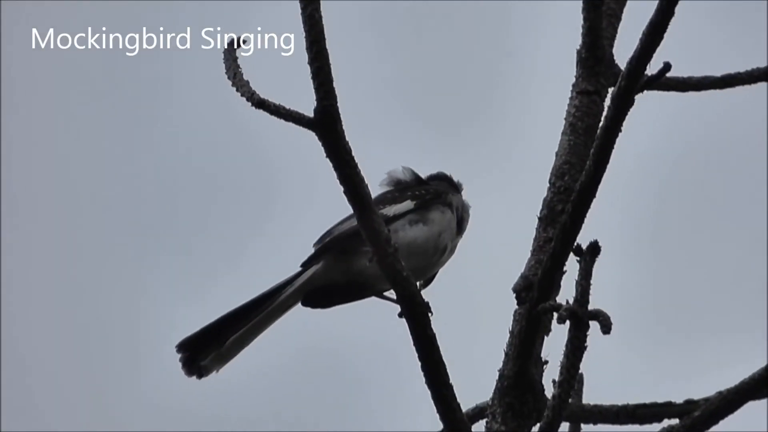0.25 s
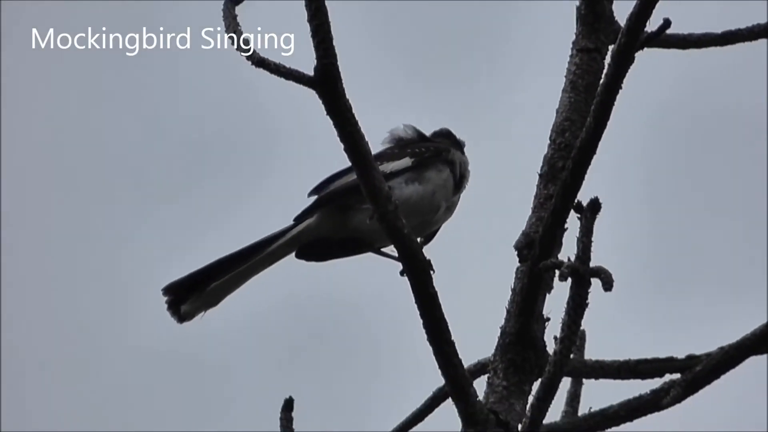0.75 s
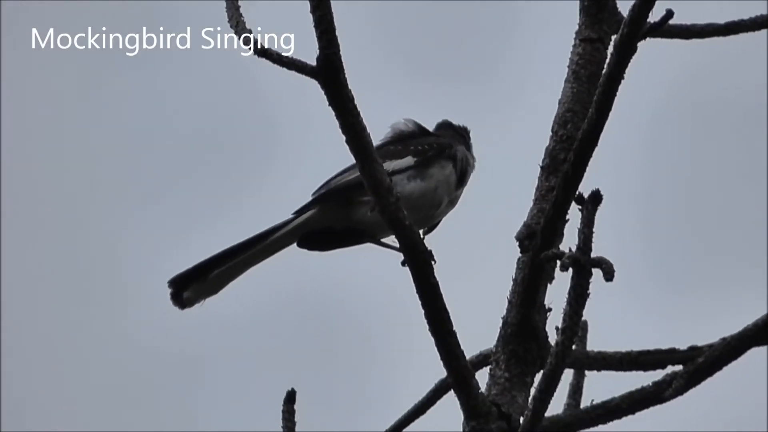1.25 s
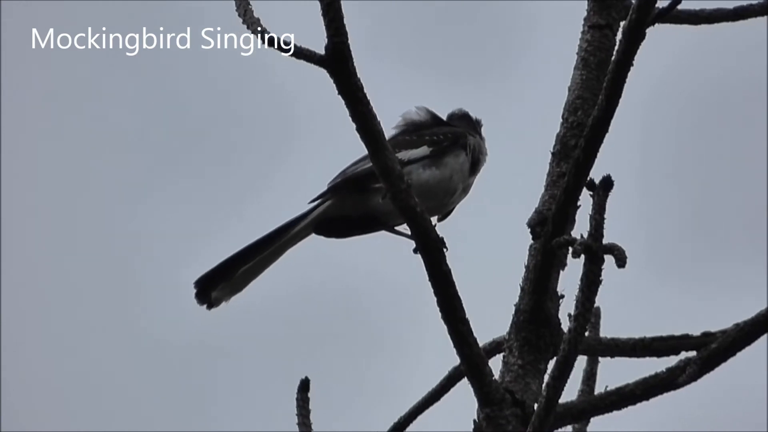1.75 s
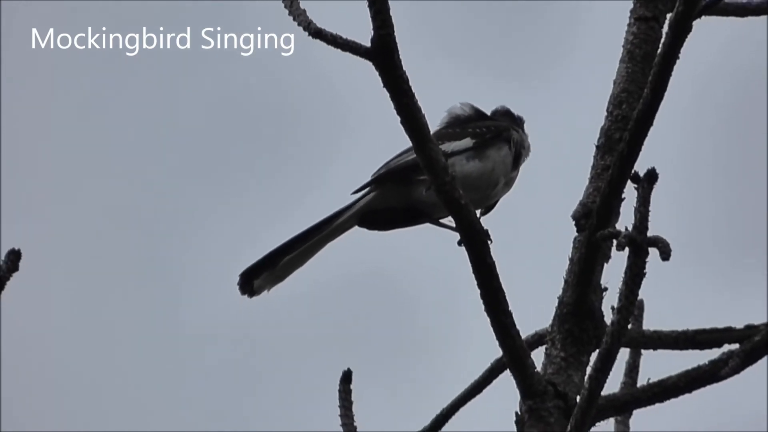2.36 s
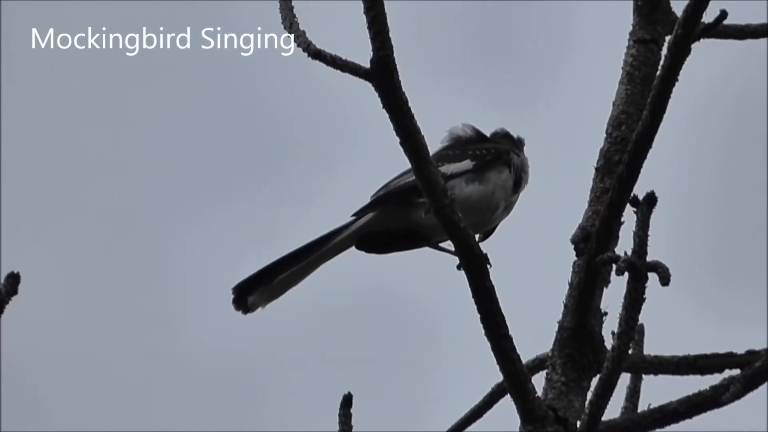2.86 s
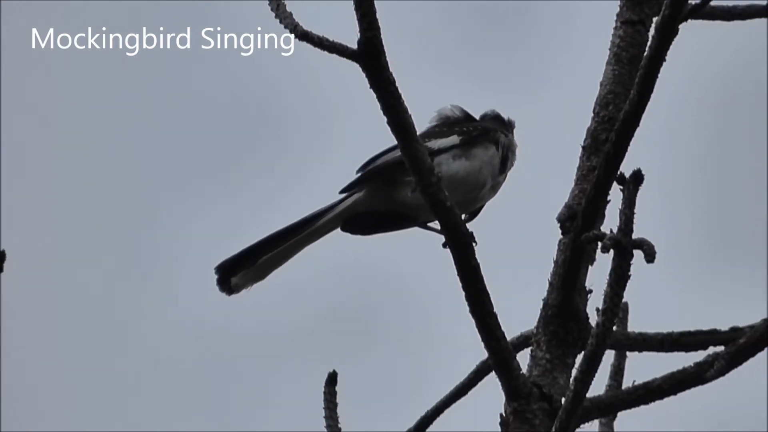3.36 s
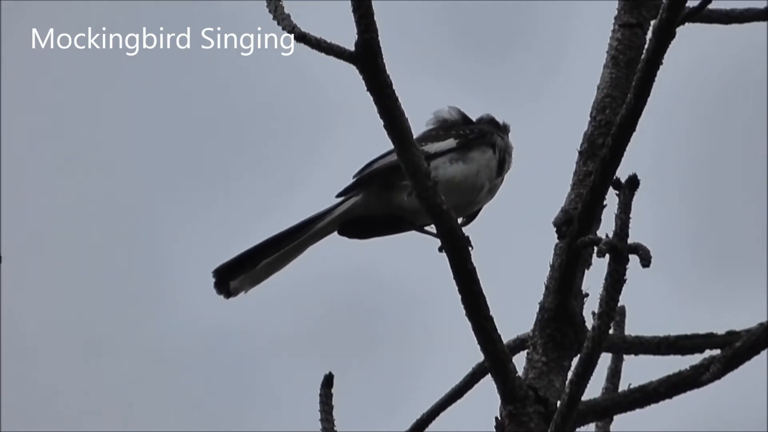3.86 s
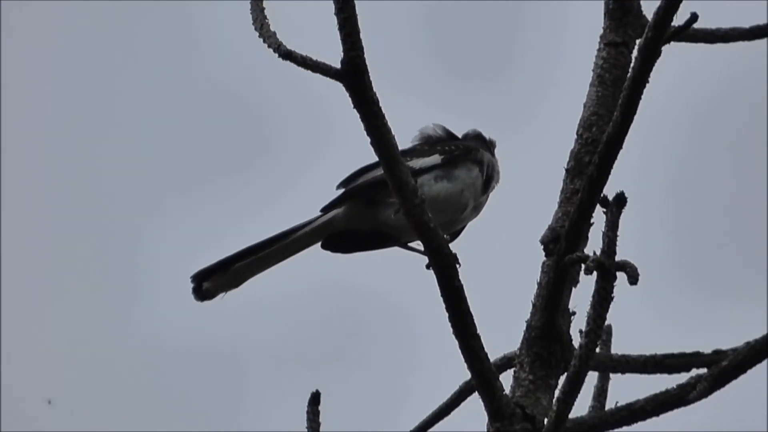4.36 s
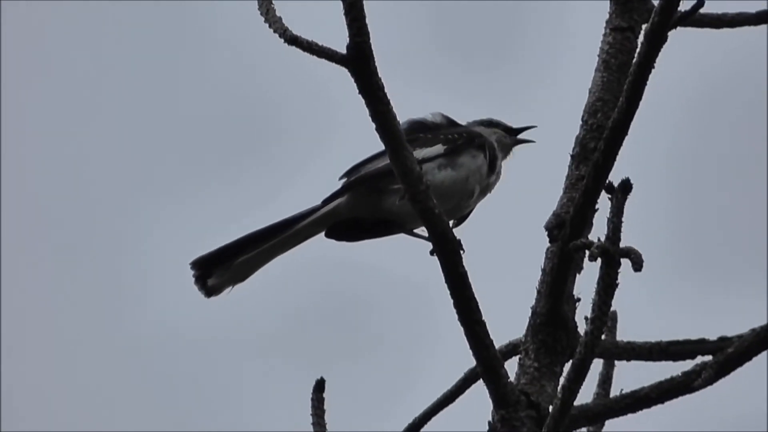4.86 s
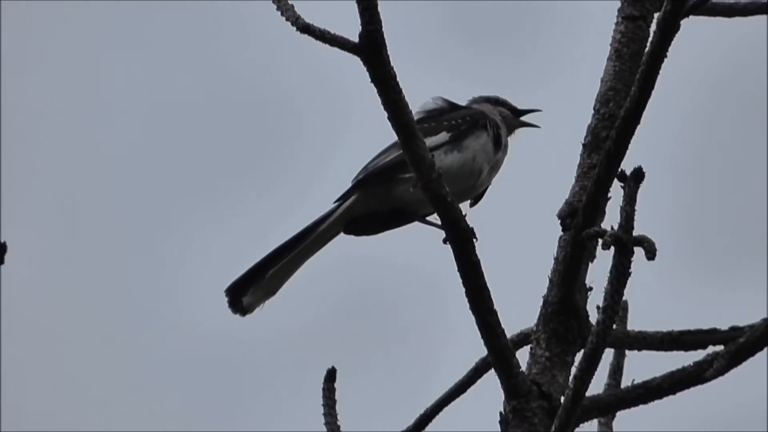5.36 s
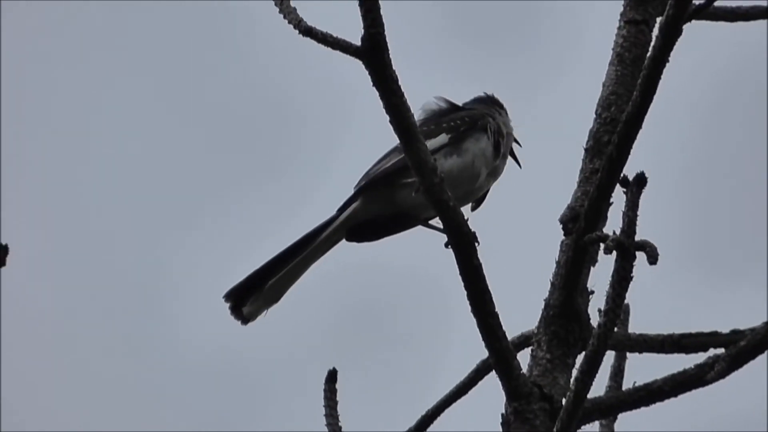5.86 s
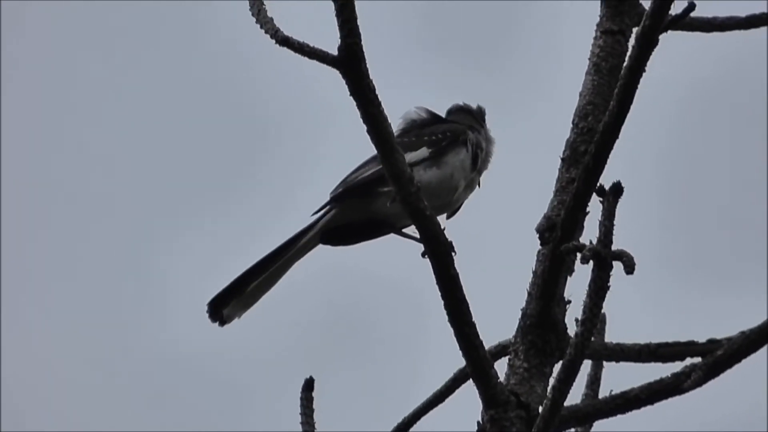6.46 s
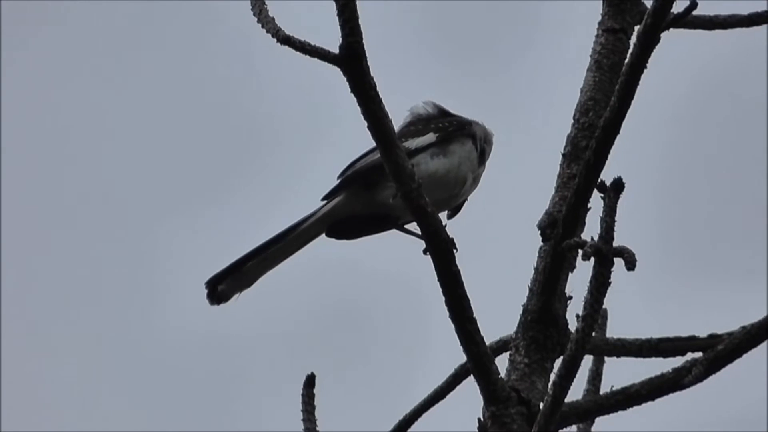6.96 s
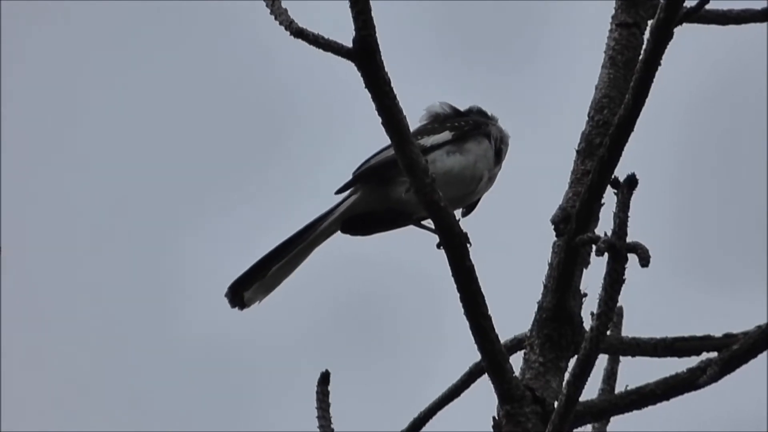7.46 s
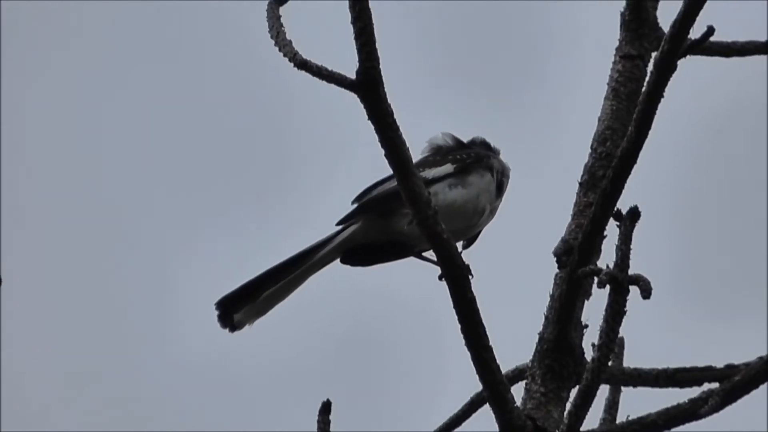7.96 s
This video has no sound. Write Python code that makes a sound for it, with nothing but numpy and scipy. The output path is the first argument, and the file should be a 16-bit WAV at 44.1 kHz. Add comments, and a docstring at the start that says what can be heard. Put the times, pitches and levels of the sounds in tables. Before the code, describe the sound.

A songbird sings outdoors, clear and up front, with a short, light echo from its surroundings. Two quick high chirps sound at the very start, then six more in a fast run from about 0.7 to 1.3 seconds. These lead straight into a string of higher, buzzy warbles, about eight a second, until 3.1 seconds. The bird pauses, leaving very faint slides and a rasp from distant birds. From 4.4 to 5 seconds it gives four quick rising whistles, followed by one arched whistle. Three longer falling whistles run from 5.5 to 6.7 seconds. Three short, sharp upward whips close the song at about 6.9, 7.3 and 7.9 seconds. Throughout, a far machine hums quietly within a soft, steady wash of outdoor noise, and other birds occasionally call far away.

```python
"""A mockingbird sings from a bare treetop. It opens with quick chirps and runs into buzzy warbles;
after a pause come four upslurs, an arched whistle, three long falling whistles and three closing whips.
Each syllable is built from gliding tones with weak overtones; walls and trees around throw it back.
Other birds call faintly in the distance, and throughout a far machine hums in the outdoor wash."""
import sys
import numpy as np
from scipy import signal
from scipy.fft import irfft
from scipy.io import wavfile
from scipy.ndimage import uniform_filter1d

SR = 44100
rng = np.random.default_rng(int(sys.argv[2]) if len(sys.argv) > 2 else 0)


def wrap_up_sound(samples):
    """Save the sound to the file named by the first command line argument, as 16-bit audio."""
    columns = np.atleast_2d(samples).T
    # keep every value between -1 and 1, then stretch to whole-number steps
    tamed = np.clip(columns, -1, 1)
    steps = np.round(tamed * 32767).astype(np.int16)
    wavfile.write(sys.argv[1], SR, steps)


N = 362061

# warbles: (first crest [s], length [s], swing rate [Hz], first pitch [Hz], last pitch [Hz],
# relative level [dB])
WARBLES = [(1.369, 0.051, 74, 4820, 5710, -24.5), (1.484, 0.045, 81, 5090, 5950, -19.5),
           (1.602, 0.045, 60, 5230, 5940, -21), (1.719, 0.058, 76, 5500, 6100, -23.5),
           (1.842, 0.068, 67, 5240, 5910, -26), (1.967, 0.051, 82, 5400, 5950, -19.5),
           (2.104, 0.056, 78, 5140, 6030, -22), (2.233, .058, 71, 5150, 6060, -24),
           (2.369, 0.063, 75, 5410, 5990, -23), (2.509, 0.051, 60, 5330, 6120, -21.5),
           (2.640, 0.054, 73, 5125, 5790, -22.5), (2.777, 0.077, 66, 5060, 6070, -24),
           (2.927, 0.058, 86, 4930, 5800, -23.5), (3.057, .053, 75, 4943, 5700, -24.5)]
# falling whistles: (time of the top [s], length [s], top pitch [Hz], first drop [s], attack [s],
# relative level [dB], closing fade [dB], opening crackle [dB])
FALLS = [(5.491, 0.27, 6835, .052, 0.0097, -19.5, -13, -48.5),
         (5.885, 0.29, 6910, .040, 0.0045, -21.5, -18, -43.5),
         (6.333, 0.32, 6920, .038, .038, -23.5, -2.5, -55)]


def syrinx(hz, db, second_db, third_db, jitter, fourth_db=-10):
    """The bird's voice: one slightly unsteady tone and three overtones, with soft ends."""
    unsteady_hz = hz * (1 + jitter * drift(len(hz), size=60))
    phase = 2 * np.pi * np.cumsum(unsteady_hz) / SR
    harmonics = enumerate([0, second_db, third_db, third_db + fourth_db], 1)
    tone = sum(amp(rel) * np.sin(k * phase) * (k * hz < SR / 2) for k, rel in harmonics)
    ends = signal.windows.tukey(len(hz), min(1, 160 / len(hz)))
    return np.sqrt(2) * amp(db) * tone * ends


def whistle(hz, db, second_db, third_db, flutter_db=1.4, shimmer_db=2.2):
    """A clean, fluttering tone; the throat mutes its overtones best in the middle of the bird's range."""
    # 2nd and 3rd harmonics through the throat: (pitch [Hz], relative level [dB])
    second = [(3750, -16), (4100, -21.5), (4450, -15.5), (4900, -29), (5300, -29), (5700, -29),
              (6100, -26.5), (6900, -15.5)]
    third = [(3750, -18), (4100, -19.5), (4500, -26), (5000, -30.5), (5400, -32)]
    flutter = flutter_db * drift(len(hz), size=250)
    shimmer = shimmer_db * drift(len(hz), size=700)
    return syrinx(hz, db + flutter, curve(second, hz) + second_db + shimmer,
                  curve(third, hz) + third_db + shimmer, jitter=0.0025)


def chirps(slide_s=0.0362, slide_hz=438, flick_s=.0095, flick_hz=560, gap_s=0.0089):
    """Each chirp is a swelling low slide that breaks into two flicks, the second higher and weaker."""
    # (first flick [s], pitch [Hz], relative level [dB])
    notes = [(.007, 4050, -20), (.128, 4140, -23), (0.73, 4255, -22.5), (0.841, 4186, -19),
             (.951, 4174, -19), (1.062, 4230, -20.5), (1.169, 4250, -17.5), (1.282, 4180, -17.5)]
    slide = ramp(np.arange(-slide_s, -.002, 1 / SR), -slide_s, slide_s)
    fade_db = -21 * (1 - ramp(slide, 0.11, 0.63)) ** 1.47
    flick = np.sin(np.pi * np.arange(0, 1, 1 / (flick_s * SR)) ** 0.75)
    for s, hz, db in notes:
        pitch = hz + slide_hz * (slide ** 1.38 - .65)
        yield s - slide_s, syrinx(pitch, db + 1.5 + fade_db, second_db=-16 - 0.26 * fade_db,
                                  third_db=-24 - .35 * fade_db, jitter=0.0056)
        for k in range(2):
            pitch = hz + 60 + k * 330 + flick_hz * flick
            tone = syrinx(pitch, db - 4 - 10 * k, second_db=-19, third_db=-19, jitter=0.018)
            yield s - .003 + k * gap_s, tone


def warbles(scoop_s=.007, release_s=0.011, swing_hz=610, hurry_turns=0.21, narrowing=0.53):
    """The pitch scoops up, then swings round a rising centre fast enough to buzz."""
    for s, length, rate, first_hz, last_hz, db in WARBLES:
        t = np.arange(-scoop_s, length + release_s, 1 / SR)
        after = np.maximum(t, 0)
        progress = after / length
        scoop = np.minimum(t / scoop_s, 0) ** 2
        settled = 1 - np.exp(-after / 0.013)
        angle = 2 * np.pi * (rate * after + hurry_turns * settled)  # the first swing runs ahead
        swing = np.cos(angle) - 0.12 * np.cos(2 * angle)  # round crests, sharp troughs
        centre = first_hz + (last_hz - first_hz) * progress ** 0.644
        width = swing_hz * (0.73 + 0.32 * settled) * (1 - narrowing * np.minimum(progress, 1) ** 3)
        width *= 1 + 0.098 * drift(len(t), size=300)  # no two swings are alike
        hz = (centre + width * swing) * (1 - .6 * np.tanh(2.17 * scoop))
        attack_db = -26 * np.tanh(1.96 * scoop) ** 1.27
        fade_db = -3 * progress ** 3 - 18 * ramp(t, length, release_s)
        level_db = db + attack_db + fade_db - 3 * swing
        second_db = -17.5 - 3 * progress + 9 * scoop + 1.8 * swing  # brightest on attack and crests
        yield s + t[0], syrinx(hz, level_db, second_db, second_db - 6, jitter=0.009)


def upslurs(scoop_hz=406, scoop_s=0.006, attack_s=0.016, release_s=0.021):
    """Each scoops up to a held note, then climbs and swells, easing off at the top."""
    # (time [s], length [s], hold [s], held pitch [Hz], top pitch [Hz], lateness of the climb [exponent],
    # relative held level [dB], relative peak level [dB], 2nd harmonic boost [dB])
    notes = [(4.354, 0.11, .042, 4890, 6280, 0.64, -33.5, -21, 16.5),
             (4.525, 0.11, 0.043, 4870, 6010, 0.92, -25, -19.5, 4.5),
             (4.708, 0.12, 0.032, 5010, 6230, 1.75, -24, -19.5, 1),
             (4.899, 0.13, 0.0064, 4854, 5930, 1.45, -24, -18, 4)]
    for s, length, hold, held_hz, top_hz, lateness, held_db, peak_db, boost_db in notes:
        t = np.arange(0, length, 1 / SR)
        climb = ramp(t, hold, length - hold)
        rise = 1 - np.cos(2.38 * climb ** lateness)
        hz = held_hz + (top_hz - held_hz) * rise / rise[-1] - scoop_hz * np.exp(-t / scoop_s)
        db = held_db + (peak_db - held_db) * bump(climb, 0.6, 0.4)
        db -= 14 * (1 - ramp(t, 0, attack_s)) ** 2 + 11 * ramp(t, length - release_s, release_s) ** 2
        second_db = boost_db * (1 - climb) ** 2 + 6 * climb ** 4
        yield s, whistle(hz, db, second_db, third_db=-4.5)


def arch():
    """One long whistle that lifts, holds its pitch, then sinks."""
    # (time [s], pitch [Hz], relative level [dB])
    contour = [(5.112, 4590, -30), (5.126, 5040, -24), (5.156, 4920, -23), (5.2, 5080, -18.5),
               (5.236, 5083, -22), (5.264, 4955, -16), (5.308, 4373, -24.5), (5.338, 4172, -17),
               (5.365, 4243, -39)]
    times, pitches, levels = np.transpose(contour)
    t = np.arange(times[0], times[-1], 1 / SR)
    hz = smooth(np.interp(t, times, pitches), size=200)
    db = smooth(np.interp(t, times, levels), size=200)
    return times[0], whistle(hz, db + 2, second_db=3, third_db=-4.5)


def falls(knee_hz=5480, end_hz=3776, scoop_s=.010, scoop_hz=650, wander=.0035):
    """Each drops fast to a knee, eases off, then sinks slowly and pushes again before it fades."""
    for s, length, top_hz, drop_s, attack_s, db, closing_db, _ in FALLS:
        t = np.arange(-scoop_s, length, 1 / SR)
        progress = ramp(t, 0, length)
        quick = np.exp(-(np.maximum(t, 0) / drop_s) ** 1.5)
        slow = np.cos(np.pi / 2 * progress ** 1.35) ** 2
        scoop = np.minimum(t / scoop_s, 0) ** 2
        hz = end_hz + (knee_hz - end_hz) * slow + (top_hz - knee_hz) * quick - scoop_hz * scoop
        hz *= 1 + wander * drift(len(t), size=600)
        opening_db = -20 * (1 - ramp(t, -scoop_s, attack_s) ** 3)
        effort_db = -4 * bump(progress, 0.36, 0.1) + 4 * bump(progress, 0.772, 0.043)
        level_db = db + opening_db + effort_db + closing_db * ramp(progress, 0.78, 0.25) ** 0.86
        yield s + t[0], whistle(hz, level_db, second_db=-.5 - 0.56 * opening_db, third_db=-3.5)


def whips(dip_s=.009, dip_hz=430, attack_s=0.027):
    """Each dips briefly, then sweeps up, loud early and fading as it climbs."""
    # (lowest point [s], length [s], lowest pitch [Hz], top pitch [Hz], relative level [dB],
    # 2nd harmonic boost [dB])
    notes = [(6.878, 0.08, 4685, 6590, -16.5, 1), (7.323, 0.085, 4780, 6605, -19.5, 5.5),
             (7.854, 0.09, 4770, 6640, -17, 1.5)]
    for s, length, low_hz, top_hz, db, boost_db in notes:
        t = np.arange(-dip_s, length, 1 / SR)
        progress = ramp(t, 0, length)
        sweep = progress + 0.373 * progress * (1 - progress)
        hz = low_hz + (top_hz - low_hz) * sweep - dip_hz * np.minimum(t / dip_s, 0)
        attack_db = -35 * (1 - ramp(t, -dip_s, dip_s + attack_s)) ** 2.4
        fade_db = -22 * ramp(t, attack_s, length - attack_s) ** 2.8
        second_db = boost_db + 9 - 16 * progress
        yield s + t[0], whistle(hz, db + attack_db + fade_db, second_db, third_db=-3)


def flips():
    """Tiny slides that lead into the warbles or close a long whistle."""
    # (time [s], length [s], first pitch [Hz], last pitch [Hz], relative level [dB], 2nd harmonic [dB])
    notes = [(1.359, 0.0091, 3820, 4600, -19, -12), (5.364, 0.0088, 4640, 3890, -17, -20),
             (5.769, 0.0146, 4095, 3660, -21, -25), (6.171, 0.01, 4174, 3860, -17, -36)]
    for s, length, first_hz, last_hz, db, second_db in notes:
        progress = np.arange(0, 1, 1 / (length * SR))
        hz = first_hz + (last_hz - first_hz) * progress
        yield s, syrinx(hz, db - 12 * (2 * progress - 1) ** 2, second_db, 1.5 * second_db, jitter=0.0036)


def crackle(end_s, length, db):
    """The rough instant before an abruptly started note."""
    return glide(end_s - length, length, first_hz=7100, last_hz=10000, db=db, rough=.15)


def mockingbird():
    """The singer's three stems; with the bird turned away, chirps and warbles lose their top overtones."""
    chirping = amp(-3) * track(chirps())
    warbling = amp(-1.65) * track(warbles())
    warbling += track(crackle(s + 0.0011, length=.011, db=db - 22.5) for s, *_, db in WARBLES)
    whistling = amp(-1.67) * track([*upslurs(), arch(), *falls(), *whips(), *flips()])
    whistling += track(crackle(s - .004, length=.02, db=db) for s, *_, db in FALLS)
    return lowpass(chirping, 13900, order=12), lowpass(warbling, 14400, order=8), whistling


def echoes(song):
    """Single reflections off near surfaces that beat against each gliding note."""
    # (delay [s], level [dB])
    taps = [(0.012, -8), (0.025, -39), (0.043, -16), (0.058, -40)]
    return lowpass(track((delay, amp(db) * song) for delay, db in taps), 10700, order=4)


def ground_echo(x, delay_s=0.043):
    """A soft bounce off the ground, without treble."""
    return track([(delay_s, lowpass(amp(-7) * x, 4300, order=6))])


def scatter(x, spread, build_s=0.014, early_db=6, early_s=0.036):
    """Diffuse returns from trees and houses: strong at first, then a thin tail whose treble dies sooner."""
    # (frequency [Hz], time to fall 60 dB [s])
    decay = [(2500, 0.63), (4000, 0.64), (6000, 0.49), (9000, 0.38), (14000, 0.28)]
    taps = rng.standard_normal((2, SR)) * (rng.random((2, SR)) < .1)
    hz, t, spectrum = signal.stft(taps, SR, nperseg=256)
    decay_db = -60 * t / curve(decay, hz)[:, None]
    envelope = amp(decay_db + early_db * bump(t, 0, early_s)) * (1 - bump(t, 0, build_s))
    tail = signal.istft(spectrum * envelope, SR, nperseg=256)[1]
    mid, side = signal.fftconvolve(x[None], tail / np.linalg.norm(tail[0]), axes=1)[:, :N]
    return np.array([mid + spread * side, mid - spread * side])


def distant_birds():
    """Faint slides and rasping calls, wrapped in diffuse returns."""
    # both: (time [s], length [s], first pitch [Hz], last pitch [Hz], relative level [dB])
    notes = [(1.71, 0.088, 2980, 2650, -67), (2.214, 0.081, 2400, 2040, -69),
             (3.086, 0.07, 2466, 2366, -61), (3.192, 0.1, 2400, 2540, -72), (3.3, 0.11, 2500, 2304, -60.5),
             (4.608, 0.091, 2210, 2610, -64.5), (5.218, .093, 2410, 2330, -69.5),
             (5.428, 0.073, 2765, 2430, -71), (7.387, 0.11, 2110, 2540, -69)]
    rasps = [(3.647, 0.17, 4300, 3600, -61), (5.707, 0.18, 3300, 2910, -64)]
    calls = track(glide(*row, rough=0.022) for row in notes)
    calls += track(glide(*row, rough=.14) for row in rasps)
    return amp(7) * calls + amp(5.5) * scatter(calls, spread=0.25)


def machine_hum(waver_db=2.5):
    """The far machine: narrow bands of noise that waver together in level."""
    # (centre [Hz], width [Hz], level [dB])
    bands = [(120.6, 3.6, -79), (341.2, 12, -57), (596.4, 14.5, -61), (714, 22, -88), (815.4, 14, -61.5),
             (1202, 27, -57), (1237.4, 44, -56)]
    hz = np.fft.rfftfreq(N, 1 / SR)
    power = sum(amp(db) ** 2 / width / (1 + 2 * ((hz - f) / width) ** 2) ** 2 for f, width, db in bands)
    level = np.sqrt(sum(amp(db) ** 2 for *_, db in bands))
    return level * stereo_noise(np.sqrt(power)) * amp(waver_db * drift(N, size=9000))


def outdoor_wash(level_db=-46.5):
    """A broad, steady bed of noise, fullest in the mids."""
    # (frequency [Hz], relative spectral density [dB])
    spectrum = [(20, -13.5), (100, -13), (160, -10.5), (250, -1), (310, 3.5), (362, 1), (387, -10),
                (425, -.5), (800, 4), (1120, 1.5), (1600, -6.5), (2600, -11), (4800, -11.5), (7800, -17.5),
                (8550, -13.5), (8850, -7.5), (9200, -14), (10500, -22.5), (15500, -31)]
    return amp(level_db) * stereo_noise(amp(curve(spectrum, np.fft.rfftfreq(N, 1 / SR))))


def stereo_noise(shape):
    """Unit-strength noise of the given spectrum; its width and balance vary with frequency."""
    # (frequency [Hz], left-right correlation [-1 to 1])
    likeness = [(50, 0.75), (250, 0.97), (350, 1), (440, 0.63), (600, 0.94), (740, -0.12), (890, -0.11),
                (1050, 0.1), (1220, 1), (1420, 0.39), (2000, 0.82), (3500, 0.97), (9000, 0.78),
                (11500, 0.46), (15000, -0.23)]
    # (frequency [Hz], left minus right [dB])
    balance = [(60, 2), (110, -1.5), (200, 0.5), (380, -3), (700, -0.5), (1290, -1.5), (2380, 1),
               (4400, -1), (8120, -0.5), (15000, 0)]
    hz = np.fft.rfftfreq(N, 1 / SR)
    a, b, c, d = rng.standard_normal((4, len(hz)))
    shared = curve(likeness, hz)
    left = a + 1j * b
    right = shared * left + np.sqrt(1 - shared ** 2) * (c + 1j * d)
    lean = amp(curve(balance, hz) / 2)
    return unit_rms(irfft(np.array([left * lean, right / lean]) * shape, N))


def glide(s, length, first_hz, last_hz, db, rough):
    """A swelling sine slide; a shaky pitch turns it into a rasp."""
    count = int(length * SR)
    hz = np.linspace(first_hz, last_hz, count) * (1 + rough * drift(count, size=20))
    tone = np.sin(2 * np.pi * np.cumsum(hz) / SR)
    return s, np.sqrt(2) * amp(db) * tone * signal.windows.tukey(count, .6)


def track(notes):
    """Lays (time [s], sound) pairs on one mono track."""
    mix = np.zeros(N)
    for s, sound in notes:
        start = round(s * SR)
        sound = sound[max(-start, 0):]
        part = mix[max(start, 0):][:len(sound)]
        part += sound[:len(part)]
    return mix


def amp(db):
    return 10 ** (np.asarray(db) / 20)


def unit_rms(x):
    return x / np.sqrt(np.mean(x ** 2) + 1e-20)


def curve(points, hz):
    """Joins (frequency [Hz], value) points on a log-frequency axis."""
    f, value = np.transpose(points)
    return np.interp(np.log(hz + 1), np.log(f + 1), value)


def smooth(x, size):
    return uniform_filter1d(uniform_filter1d(x, size, mode="nearest"), size, mode="nearest")


def drift(count, size):
    """A random wobble of unit strength, smoothed over size samples."""
    return unit_rms(smooth(rng.standard_normal(count + 2 * size), size)[size:-size])


def ramp(t, start, length):
    return np.clip((t - start) / length, 0, 1)


def bump(t, centre, width):
    return np.exp(-((t - centre) / width) ** 2)


def lowpass(x, hz, order):
    return signal.sosfilt(signal.butter(order, hz, fs=SR, output="sos"), x)


def highpass(x, hz):
    return signal.sosfilt(signal.butter(4, hz, "high", fs=SR, output="sos"), x)


def scene():
    """The singer up front with its reflections, distant birds behind, hum and wash underneath."""
    # the bed sinks a little under the long whistles: (time [s], gain [dB])
    bed_fader = [(0, 1), (3.7, 0.45), (5.6, -1.3), (6.6, 0), (8.2, 0.5)]
    chirping, warbling, whistling = mockingbird()
    song = chirping + warbling + whistling
    # with the bill pointed down and away, more arrives by reflection, above all the overtones
    diffuse = scatter(amp(-4) * chirping + amp(-5) * warbling + amp(-7) * whistling, spread=0.21)
    diffuse += scatter(amp(-11) * highpass(chirping + warbling, 6800), spread=0.47)
    birds = distant_birds()
    bed_gain = amp(np.interp(np.arange(N) / SR, *np.transpose(bed_fader)))
    bed = bed_gain * (machine_hum() + outdoor_wash())
    return song + echoes(song) + ground_echo(chirping) + diffuse + birds + bed


def record(dry):
    """A steep high cut on the whole mix."""
    high_cut = signal.firwin(511, 15750, window=("kaiser", 9), fs=SR)
    return signal.oaconvolve(dry, high_cut[None], "same")


dry = scene()
out = record(dry)
wrap_up_sound(out)
```